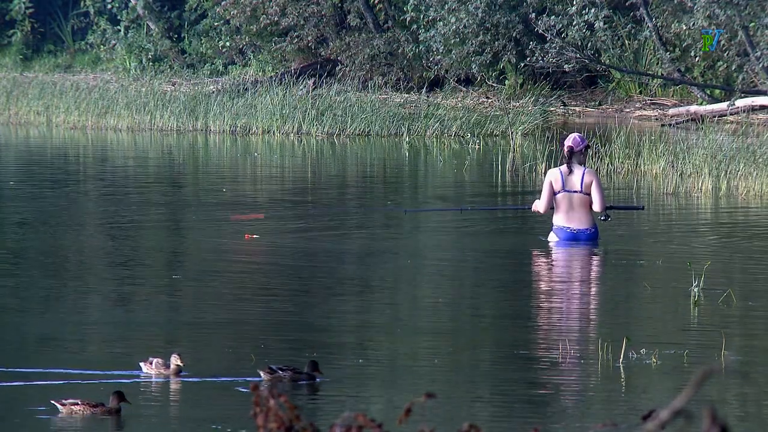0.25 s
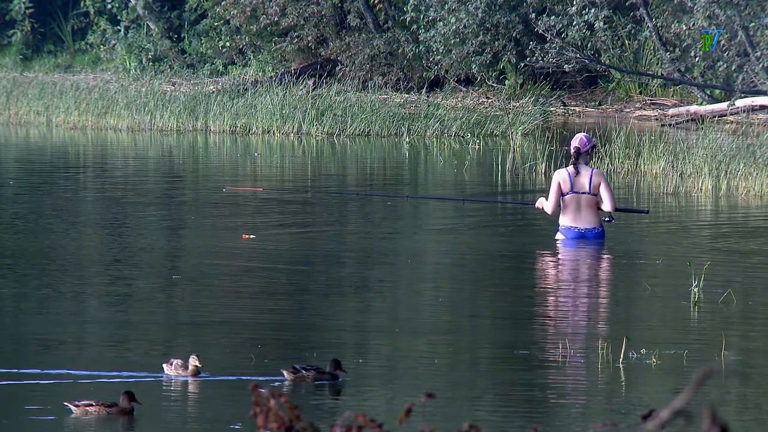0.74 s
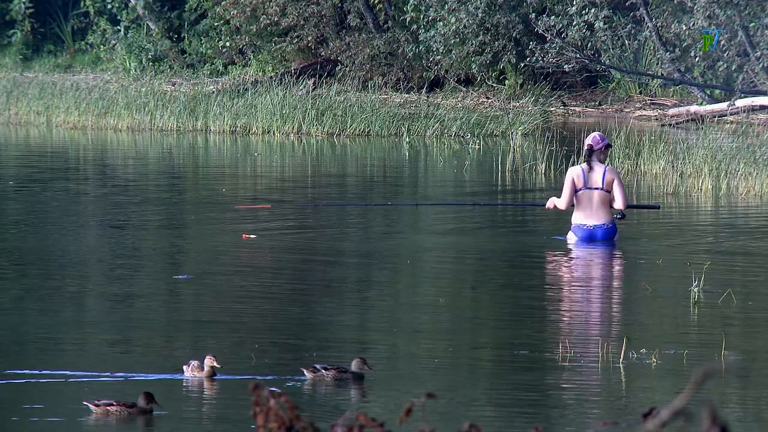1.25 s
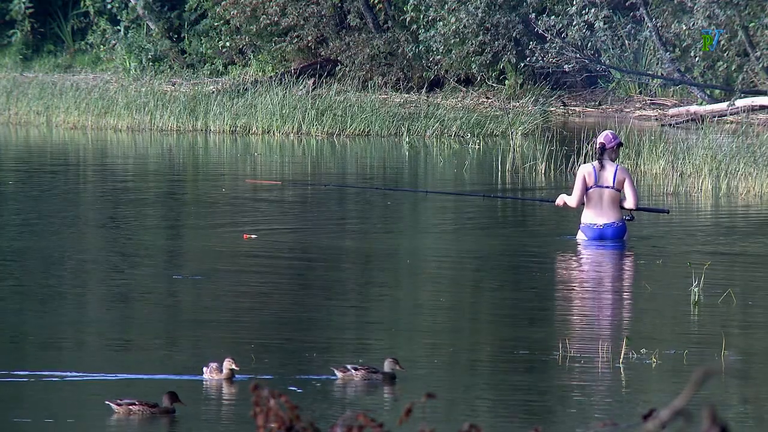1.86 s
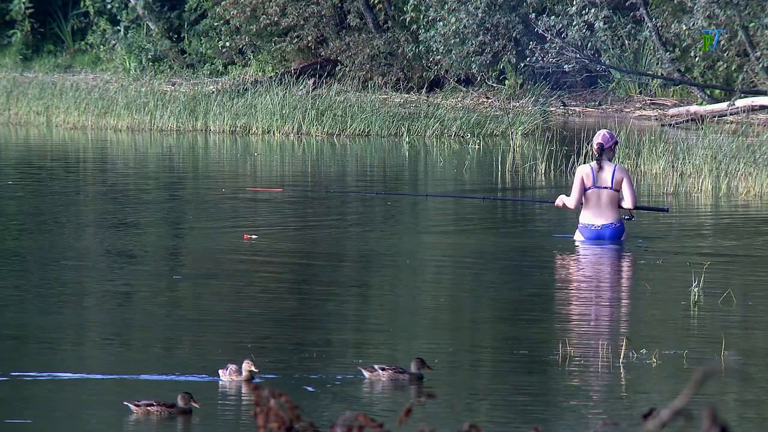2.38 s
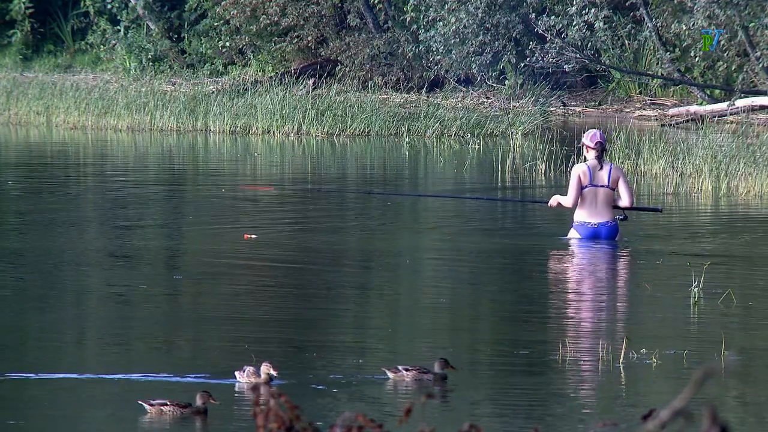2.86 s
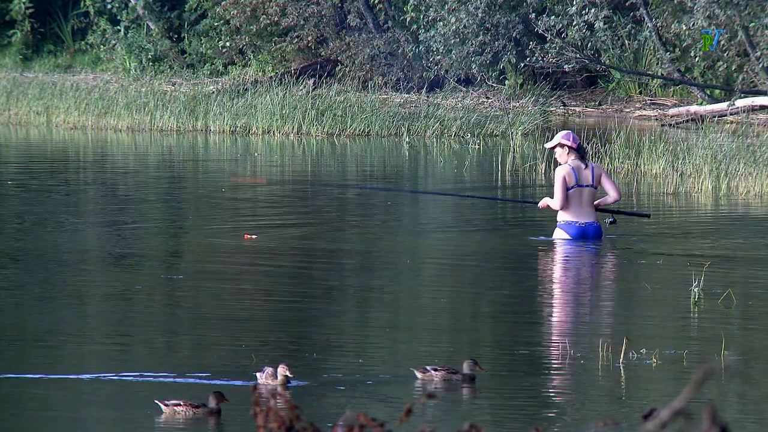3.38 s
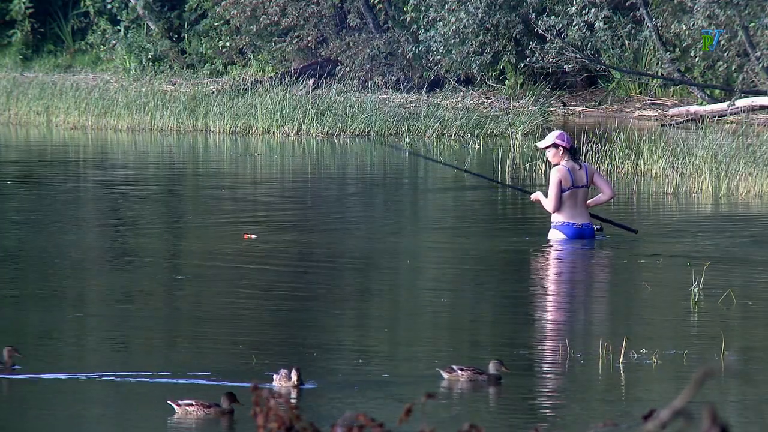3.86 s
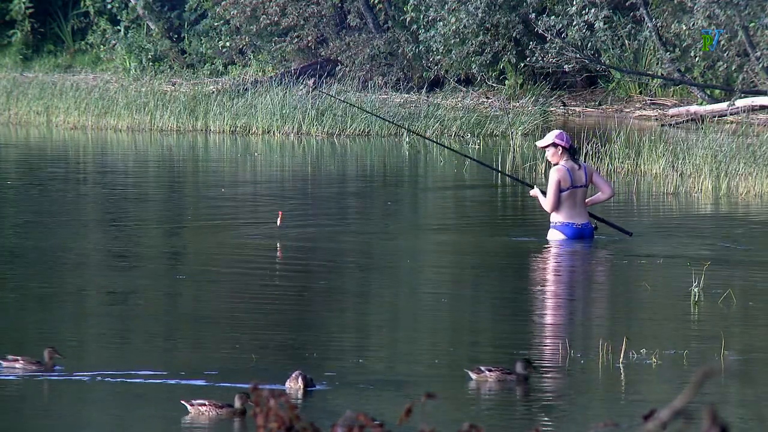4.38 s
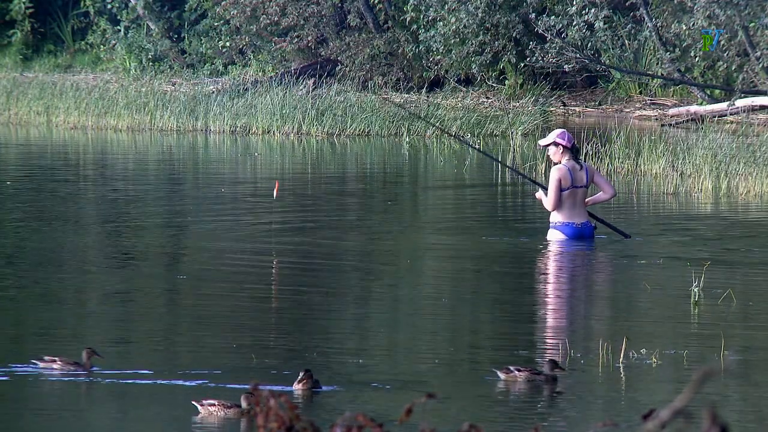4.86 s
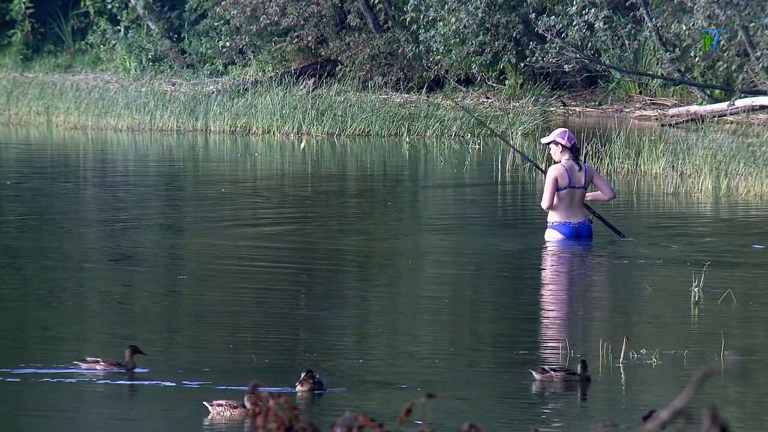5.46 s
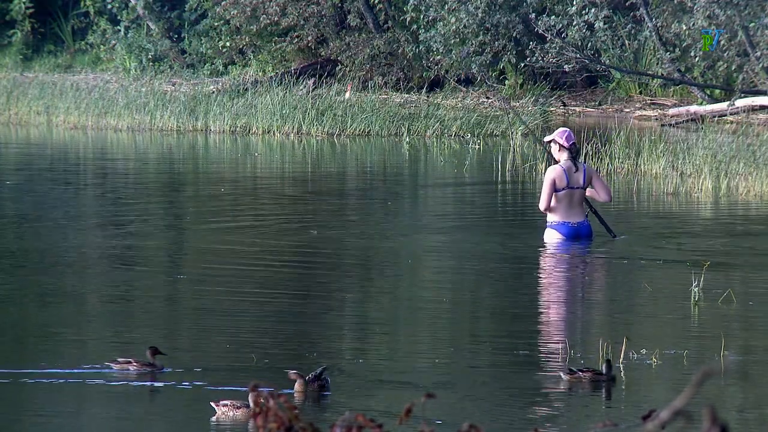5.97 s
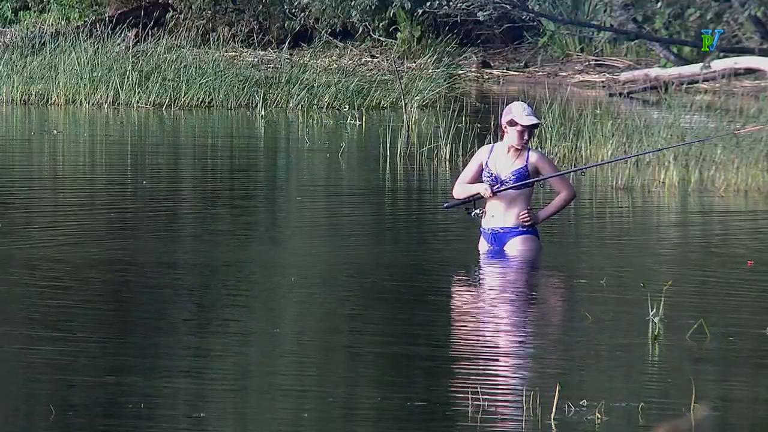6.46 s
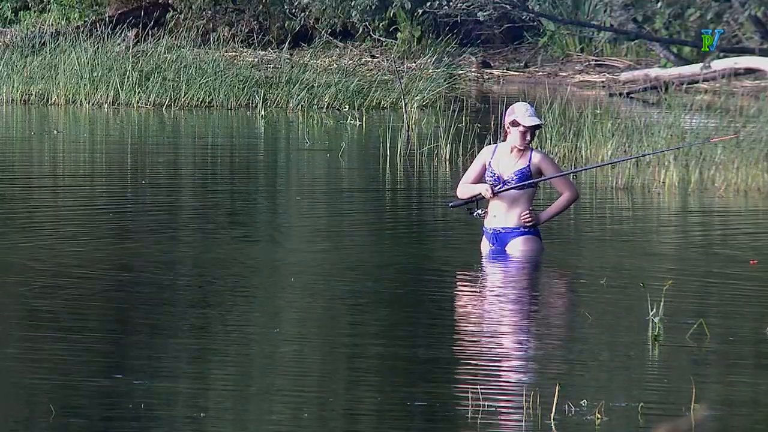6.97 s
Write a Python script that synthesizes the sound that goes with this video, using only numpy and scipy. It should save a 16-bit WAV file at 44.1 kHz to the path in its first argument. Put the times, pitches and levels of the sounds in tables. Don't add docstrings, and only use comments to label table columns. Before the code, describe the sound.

Close on the left, a duck quacks seven times, roughly every three quarters of a second, each call short, nasal and raspy. Low uneven wind rumbles on unshielded stereo microphones. Small gulps, plops and drips mark paddling, with little splashes near the middle and end. Very high bush-crickets buzz in the grass, and after the last quack only water, wind and insects remain.

```python
import sys
import numpy as np
from scipy import signal
from scipy.fft import rfft, irfft
from scipy.io import wavfile
from scipy.ndimage import uniform_filter1d

SR = 44100
rng = np.random.default_rng(int(sys.argv[2]) if len(sys.argv) > 2 else 0)


def volts(x):
    e = np.asarray(x, float) / 20
    return 10 ** e


def wrap_up_sound(samples):
    columns = np.atleast_2d(samples).T
    tamed = np.clip(columns, -1, 1)
    steps = np.round(tamed * 32767).astype(np.int16)
    wavfile.write(sys.argv[1], SR, steps)


N = 318392

# time in seconds, level in dB, left minus right in dB.
AIR_LEVEL = [(0, -73.5, .5), (4.2, -74, 1), (4.6, -71, 0.5), (4.9, -74.5, -1.5), (6.1, -72.5, -2),
             (6.75, -69, -1.5), (7.22, -69, -1)]
# frequency in Hz, density in dB per Hz.
AIR_SHARED_COLOUR = [(120, -11.5), (200, -3.5), (352, -7.5), (425, -7.5), (761, -12), (829, -11.5),
                     (967, -13.5), (1130, -13), (2660, -12), (7820, -24.5), (12000, -14), (15600, -36.5),
                     (22000, -120)]
# frequency in Hz, density in dB per Hz.
AIR_APART_COLOUR = [(120, -54), (200, -5.5), (432, -6.5), (748, -12), (1020, -13), (1640, -17),
                    (3100, -15.5), (4760, -23), (12000, -20.5), (15600, -42), (22000, -120)]
# time in seconds, rumble level in dB, left minus right in dB.
WIND_LEVEL = [(0.0, -62.5, 8.0), (0.14, -64, -2.5), (1.14, -57.5, 5.5), (1.61, -56.5, 4), (1.73, -52.5, 4),
              (2.39, -58.5, -9.0), (2.67, -56, 9), (2.81, -55, -4), (2.87, -46, 10.5), (3.62, -57, 2.5),
              (3.86, -50.5, 0), (4.02, -49.5, 11), (5.43, -53.5, -0.5), (5.75, -55.5, 8), (5.97, -54, -2.5),
              (6.84, -42.5, 4), (7.14, -52.5, -4), (7.22, -52.5, 11.0)]
# frequency in Hz, density in dB per Hz.
WIND_SPECTRUM = [(8.8, -31.5), (15, 7), (27, 2.5), (53, -3.5), (109, -13.5), (286, -38), (500, -46),
                 (650, -58), (1100, -120)]
# time in seconds, level in dB.
STEADY_LEVEL = [(0, -57), (2, -57.5), (3.7, -56), (4.6, -57), (5.9, -57.5), (6.4, -52), (7.22, -49)]
# frequency in Hz, density in dB per Hz.
STEADY_SPECTRUM = [(6000, -36), (9000, -27.5), (9900, -20.5), (12300, -15), (13000, -8.5), (13600, -4.5),
                   (14200, -2), (14600, -4), (14850, 5.5), (15100, 4), (15400, 1), (15600, -2.5),
                   (15850, -3.5)]
# start in seconds, end in seconds, level in dB.
VERSE_TIMES = [
    (.1, 1.29, -56),
    (1.392, 2.348, -55.5),
    (3.55, 4.28, -62),
    (4.903, 6.05, -57),
]
# frequency in Hz, density in dB per Hz.
VERSE_SPECTRUM = [(6000, -52), (9000, -48), (10300, -15.5), (12300, -21), (13000, -3.5), (13600, -3),
                  (14100, -6.5), (14800, 9), (15200, 3.5), (15850, 0.5)]
# first tick in seconds, last tick in seconds, peak in dB, share turned away.
TICK_TRAINS = [
    (3.5987, 3.928, -58.5, .1),
    (4.145, 4.4498, -59.5, .9),
    (4.4664, 4.4664, -56, .9),
    (6.5574, 6.5574, -64, .3),
    (6.7714, 6.7714, -63, -.5),
    (6.8064, 6.8064, -71, -.5),
    (7.0724, 7.0728, -51.5, 0.35),
    (7.1495, 7.1495, -48.5, 0.8),
]
# frequency in Hz, width in Hz, level in dB.
TICK_WING = [(7260, 720, -3), (9160, 420, -3)]
# frequency in Hz, width in Hz, level in dB.
TICK_SHARP = [(10520, 1550, -3), (11900, 1100, -1)]
# start in seconds, end in seconds, wingbeat at start in Hz, at end in Hz, level in dB.
FLY_PASSES = [
    (2.7, 3.55, 188.5, 186, -86),
    (3.55, 4.25, 186.5, 181, -81.5),
    (4.7, 5.15, 209, 206, -85),
    (5.38, 5.6, 180.5, 176, -80),
]
# multiple of the beat, level in dB.
FLY_HARMONICS = [(1, -4), (2, 0), (3, -1), (4, -2), (5, -1), (6, -2), (7, -6)]
# time in seconds, peak in dB, pitch in Hz, rise in octaves.
GULP_EVENTS = [
    (1.27, -64.5, 598, .1),
    (1.7, -57, 462, .26),
    (2.74, -62.5, 464, .24),
    (3.22, -62.5, 388, 1),
    (4.265, -58, 472, .2),
    (4.675, -60, 584, .1),
    (6.2, -61.5, 423, 0.28),
]
# time in seconds, peak in dB, pitch in Hz, rise in octaves.
LEFT_PLOPS = [(1.55, -65, 1200, -.2), (1.605, -65, 950, 0), (1.68, -58, 900, .2), (1.77, -61, 895, .2),
              (4.445, -63, 1050, 0), (4.49, -63.5, 650, -.1), (2.994, -64, 1140, 0.076),
              (3.12, -56, 816, -0.024), (4.27, -59, 1257, .18), (4.417, -61, 1510, 0),
              (4.434, -58, 2375, .18), (4.471, -60, 1244, .2), (4.486, -56, 1330, 0.018),
              (4.531, -62, 1400, 0.25), (4.562, -61, 1600, 0.098), (5.362, -65.5, 676, 0.52),
              (5.533, -60, 778, 0.57), (5.555, -67, 710, -.2), (5.838, -61, 2200, .05),
              (5.87, -63, 2300, .05), (5.955, -65.5, 610, .04), (5.955, -61.5, 1400, 0.23),
              (6.03, -61, 606, 0.45), (6.04, -65, 1306, .3), (6.062, -65, 850, .79),
              (6.166, -68, 993, 0.26), (6.69, -64, 985, .41)]
# time in seconds, peak in dB, pitch in Hz, rise in octaves.
RIGHT_DRIPS = [(1.085, -66, 637, .1), (1.091, -60.5, 1330, .2), (1.54, -65, 3100, .1),
               (1.671, -60, 2780, .07), (1.769, -64, 2080, 0.42), (1.843, -62, 3500, .04),
               (1.937, -59, 2750, 0), (2.339, -64, 2900, .04), (4.349, -64, 3200, .14),
               (4.662, -72, 2300, .3), (4.772, -66, 4320, .1)]
# left minus right in dB, cycles of life, more cycles per octave of rise.
BUBBLES = [
    (6, 14.6, 15),
    (14, 13.2, 10.7),
    (-11, 24, 1.5),
]
# middle in seconds, half length in seconds, droplets per second, left minus right in dB.
PADDLE_BOUTS = [
    (1.75, 0.14, 165, 4),
    (4.496, 0.23, 300, 7.5),
    (6.051, .35, 200, 20),
    (7.101, 0.55, 215, 0),
]
# time in seconds, peak in dB, left minus right in dB.
SPLASH_EVENTS = [
    (1.66, -58, 0),
    (2.674, -58, 12),
    (4.45, -62, 10),
    (4.51, -65, 10),
    (4.845, -63, 2),
    (6.035, -58.5, 12),
    (6.16, -60.5, 10),
    (7.033, -56.5, 0),
]
# frequency in Hz, width in Hz, level in dB.
SPRAY_BODY = [(1000, 1100, 4.5), (2600, 2500, -1)]
# first pulse in seconds, length in seconds, settled pitch in Hz, peak in dB,
# rasp in dB per octave.
QUACK_EVENTS = [
    (0.025, 0.16, 184.6, -48, -6),
    (0.782, 0.15, 188.6, -48, -2),
    (1.662, 0.12, 179, -52.5, -9),
    (2.399, 0.16, 178, -52, -3),
    (3.082, 0.17, 188.4, -48, -4.5),
    (3.821, .15, 189, -48, -8.5),
    (4.625, 0.16, 181.8, -49, -7),
]
# frequency in Hz, width in Hz, level in dB.
WINDPIPE_MODES = [(374, 145, 0.5), (558, 164, -0.5), (760, 81, 0.5), (956, 190, 1), (1314, 102, 10.5)]
# frequency in Hz, width in Hz, level in dB.
THROAT_MODES = [(1400, 110, -15.5), (1675, 340, 1), (1888, 233, 5.5), (2285, 303, 5.5), (2940, 690, -3),
                (3100, 1300, -12)]
# frequency in Hz, width in Hz, level in dB.
BILL_MODES = [(4120, 2400, -0.5), (4970, 500, 2), (5170, 700, -1.5), (5720, 680, 1.5), (7120, 1100, -6),
              (8530, 710, -1.5)]

HOARSE_LEAST, HOARSE_MOST = 0.17, 0.27


def rms_one(x):
    return x / np.sqrt(np.mean(x ** 2) + 1e-20)


def in_time(rows):
    s, *columns = np.transpose(rows)
    return [np.interp(np.arange(N) / SR, s, c) for c in columns]


def coloured(x, spectrum):
    hz, level_db = np.transpose(spectrum)
    bins = np.maximum(np.fft.rfftfreq(N, 1 / SR), 1)
    gain = volts(np.interp(np.log(bins), np.log(hz), level_db))
    return rms_one(irfft(rfft(x) * gain, N))


def panned(x, pan_db):
    left, right = volts(pan_db / 2), volts(-pan_db / 2)
    return x * np.array([left, right]).reshape(2, -1) * 2 / (left + right)


def drift(rate_hz):
    r = np.exp(-80 * np.pi * rate_hz / SR)
    slow = signal.lfilter([1], [1, -2 * r, r * r], rng.standard_normal(N // 40 + 2002))[2000:]
    return np.interp(np.arange(N) / 40, np.arange(len(slow)), rms_one(slow))


def gate(start, end, rise_s, fall_s):
    return np.interp(np.arange(N) / SR, [start, start + rise_s, end, end + fall_s], [0, 1, 1, 0])


def resonances(x, modes):
    out = 0
    for k, (hz, width_hz, level_db) in enumerate(modes):
        r = np.exp(-np.pi * width_hz / SR)
        pole = [1, -2 * r * np.cos(2 * np.pi * hz / SR), r * r]
        ring = signal.lfilter([1 - r, 0, r - 1], pole, x + 1e-18)
        out = out + (-1) ** k * volts(level_db) * ring
    return out


def add(track, piece, at_s):
    i = round(at_s * SR)
    track[..., i:i + piece.shape[-1]] += piece[..., :N - i]


def air():
    level_db, pan_db = in_time(AIR_LEVEL)
    shared = coloured(rng.standard_normal(N), AIR_SHARED_COLOUR)
    apart = coloured(rng.standard_normal(N), AIR_APART_COLOUR)
    breath_db = 0.4 * drift(4)
    return panned(volts(level_db + breath_db + 2), pan_db) * [shared + apart, shared - apart]


def wind():
    level_db, pan_db = in_time(WIND_LEVEL)
    ports = np.array([coloured(rng.standard_normal(N), WIND_SPECTRUM) * volts(drift(7)) for port in range(2)])
    above_90_hz = signal.butter(2, 90, "high", fs=SR, output="sos")
    flutter = signal.sosfilt(above_90_hz, ports)
    flutter_db = 0.3 * (level_db - level_db.mean()) + 3 * drift(9)
    gust = volts(level_db + 1.37 * drift(3.1) + 5)
    sway_db = 2.5 * drift(3.2)
    return panned(gust, pan_db + sway_db) * (ports - flutter + volts(flutter_db) * flutter)


def bush_cricket(level, colour, strokes_hz, sharpness, blur, pan_db, loose):
    cycle = (strokes_hz * np.arange(N) / SR + 0.033 * drift(2.4)) % 1
    uneven_db = 1.5 * drift(60)
    stroke = blur + uniform_filter1d(np.exp(-sharpness * cycle), size=50) * volts(uneven_db)
    song = coloured(rng.standard_normal(N) * stroke, colour)
    grass = np.array([coloured(rng.standard_normal(N), colour) for side in range(2)])
    return level * (panned(song, pan_db) + loose * grass)


def steady_cricket():
    level = volts(in_time(STEADY_LEVEL)[0])
    return bush_cricket(level, STEADY_SPECTRUM, 90.5, sharpness=6.8, blur=0.66, pan_db=6.0, loose=0.15)


def verse_cricket():
    level = np.zeros(N)
    for start, end, level_db in VERSE_TIMES:
        swell = gate(start, end, rise_s=0.23, fall_s=0.03)
        level += volts(level_db - 19 * (1 - swell)) * (swell > 0)
    return bush_cricket(level, VERSE_SPECTRUM, 98.1, sharpness=12.0, blur=0.13, pan_db=12.5, loose=0.04)


def grasshopper():
    body, edge, t = np.zeros((2, N)), np.zeros((2, N)), np.arange(SR // 40) / SR
    gap_s, first_tick_db = 0.08, -4
    scrape = np.exp(-((t - 0.006) / 0.0043) ** 2)
    for first, last, peak_db, turned in TICK_TRAINS:
        for s in np.linspace(first, last, round((last - first) / gap_s) + 1):
            level_db = peak_db + first_tick_db * (s == first) + 0.51 * rng.standard_normal()
            stroke = panned(volts(level_db + 5) * scrape, -5 - 5.5 * turned)
            add(body, stroke * rng.standard_normal(t.size), s - 0.003)
            add(edge, volts(3 - 7.2 * turned) * stroke * rng.standard_normal(t.size), s - 0.003)
    return resonances(body, TICK_WING) + resonances(edge, TICK_SHARP)


def fly():
    beat_points, level = [], np.zeros(N)
    for start, end, first_hz, last_hz, level_db in FLY_PASSES:
        beat_points += [(start, first_hz), (end, last_hz)]
        level += volts(level_db) * gate(start, end, rise_s=0.1, fall_s=0.1)
    beat_hz, = in_time(beat_points)
    phase = 2 * np.pi * np.cumsum(beat_hz * (1 + 0.0037 * drift(8.8))) / SR
    buzz = sum(volts(order_db + 2.1 * drift(5.1)) * np.sin(k * phase) for k, order_db in FLY_HARMONICS)
    return panned(level * rms_one(buzz), -22.0)


def bubble(peak_db, hz, pan_db, rise, life_s):
    t = np.arange(round(2 * life_s * SR)) / SR
    phase = 2 * np.pi * np.cumsum(hz * 2 ** (rise * t / life_s)) / SR
    tone = np.sin(phase) * np.minimum(t / (0.21 * life_s), 1) * np.exp(-2.2 * (t / life_s) ** 1.26)
    spatter = uniform_filter1d(rng.standard_normal(t.size), size=11) * np.exp(-t / 0.0038)
    return panned(volts(peak_db) * (tone + 1.34 * spatter), pan_db)


def plops():
    out = np.zeros((2, N))
    for rows, (pan_db, cycles, per_octave) in zip([GULP_EVENTS, LEFT_PLOPS, RIGHT_DRIPS], BUBBLES):
        for s, peak_db, hz, rise in rows:
            life_s = (cycles + per_octave * abs(rise)) / hz
            add(out, bubble(peak_db, hz, pan_db, rise, life_s), s)
    return out


def trickle():
    out = np.zeros((2, N))
    when, size, pitch, side = rng.random((4, N // 50))
    t = np.arange(when.size) * 50 / SR
    calm_per_s, calm_pan_db = 50, 8
    per_s, pan_sum = calm_per_s, calm_per_s * calm_pan_db
    for middle, half_s, rate, bout_pan_db in PADDLE_BOUTS:
        bout = rate * np.exp(-((t - middle) / half_s) ** 2)
        per_s = per_s + bout
        pan_sum = pan_sum + bout * bout_pan_db
    pan_db = pan_sum / per_s
    for k in np.flatnonzero(when < per_s * 50 / SR):
        hz = 700 * 2 ** (2.8 * pitch[k])
        peak_db = -80 - 3.8 * np.log(size[k] + 0.05)
        add(out, bubble(peak_db, hz, pan_db[k] + 30 * (side[k] - 0.5), 0.17, 14.7 / hz), t[k])
    return out


def splashes():
    out, t = np.zeros((2, N)), np.arange(SR // 16) / SR
    burst = np.minimum(t / 0.0022, 1) * np.exp(-t / 0.012)
    for s, peak_db, pan_db in SPLASH_EVENTS:
        add(out, panned(volts(peak_db) * burst * rng.standard_normal(t.size), pan_db), s)
    return resonances(out, SPRAY_BODY)


def syrinx(quack, jitters, modes, luck, closed_share, muffle_db, rise_s, shake, rasp_share):
    start, end, top_hz, hoarse, rasp_db = quack
    low_hz, gape = 131.95, 1.018
    climb_s = 0.05 + 0.35 * (hoarse - HOARSE_LEAST)
    out, t, s = np.zeros(N), np.arange(SR // 50) / SR, start
    hz, width_hz, level_db = np.transpose(modes)[:, :, None]
    signs, octaves = (-1.) ** np.arange(len(hz))[:, None], np.log2(hz / hz[0])
    swell = (1 - np.exp(-t / rise_s)) ** 3
    decay = np.exp(-np.pi * width_hz * t)
    for jitter, (rebound, *scatter) in zip(jitters, luck):
        if s > end:
            break
        opening = 1 - np.exp(-((s - start) / climb_s) ** 1.7)
        parting = 1 - np.exp(-((s - start) / (0.16 * (end - start))) ** 1.35)
        mode_hz = hz * gape * (closed_share + (1 - closed_share) * parting)
        ringing = np.sin(2 * np.pi * mode_hz * t)
        slope_db = rasp_share * rasp_db - muffle_db * (1 - parting) ** 2
        scatter_db = 11.4 * hoarse * np.array(scatter)[:len(hz), None]
        strength = signs * volts(level_db + slope_db * octaves + scatter_db)
        turbulence = uniform_filter1d(rng.standard_normal(t.size), size=15) * np.minimum(t / 0.0027, 1)
        puff = 1 + shake * hoarse * turbulence
        pulse = swell * puff * np.sum(strength * ringing * decay, axis=0)
        add(out, pulse, s)
        add(out, (0.29 + 0.97 * hoarse) * volts(2 * rebound) * pulse, s + 0.0041 - 0.001865 * opening)
        pitch_hz = low_hz + (top_hz - low_hz) * opening
        s += (1 + 0.11 * hoarse * jitter * (1 - 0.22 * opening)) / pitch_hz
    return out / np.sqrt(uniform_filter1d(out ** 2, size=700).clip(0) + 0.0013)


def duck():
    out = np.zeros(N)
    dull_db, bright_db = -40, -20
    for start, length, top_hz, peak_db, rasp_db in QUACK_EVENTS:
        luck, jitters = rng.standard_normal((40, 7)), rng.standard_normal(40)
        hoarse = np.clip(HOARSE_LEAST + 0.09 * (-50.7 - peak_db), HOARSE_LEAST, HOARSE_MOST)
        end = start + length
        quack = start, end, top_hz, hoarse, rasp_db
        attack_s = 0.033 + 0.041 * (hoarse - HOARSE_LEAST)
        effort_db, bill_db = in_time([
            (start, -17.5, dull_db),
            (start + attack_s, -5, bright_db),
            (start + 0.77 * length, 0, bright_db),
            (end - 0.008, -1, bright_db),
            (end + 0.011, -34, bright_db)])
        voice_db = peak_db + effort_db
        windpipe = syrinx(quack, jitters, WINDPIPE_MODES, 0.94 * luck, closed_share=0.75, muffle_db=-8.0,
                          rise_s=0.0006, shake=0, rasp_share=0)
        throat = syrinx(quack, jitters, THROAT_MODES, luck, closed_share=0.756, muffle_db=16.0,
                        rise_s=0.00031, shake=6.7, rasp_share=0)
        bill = syrinx(quack, jitters, BILL_MODES, luck, closed_share=0.97, muffle_db=26.0,
                      rise_s=0.0001, shake=34.0, rasp_share=2.4)
        out += volts(voice_db - 10 - 22.7 * hoarse) * windpipe
        out += volts(voice_db - 1.6) * throat
        out += volts(voice_db + bill_db + 4.5) * bill
    t = np.arange(SR // 8) / SR
    bank = rng.standard_normal(t.size) * np.exp(-t / 0.022)
    out += volts(-47) * signal.fftconvolve(out, bank)[:N]
    return panned(out, 50.0)


def scene():
    background = air() + wind()
    insects = steady_cricket() + verse_cricket() + grasshopper() + fly()
    water = plops() + trickle() + splashes()
    return background + insects + water + duck()


def band_limit(x):
    return signal.sosfilt(signal.butter(12, 17040, fs=SR, output="sos"), x)


def record(dry):
    hz = np.fft.rfftfreq(N, 1 / SR)
    joint_above_hz, top_hz = 10250, 15780
    spectrum = rfft(dry)
    low = irfft(spectrum * (hz < joint_above_hz), N)
    high = irfft(spectrum * ((hz >= joint_above_hz) & (hz < top_hz)), N)
    joint = high.sum(axis=0)
    joint_power = uniform_filter1d(joint ** 2, size=1024) + 1e-14
    share = uniform_filter1d(high ** 2, size=1024) / joint_power
    return band_limit(low + joint * np.sqrt(share.clip(0)))


dry = scene()
out = record(dry)
wrap_up_sound(out)
```